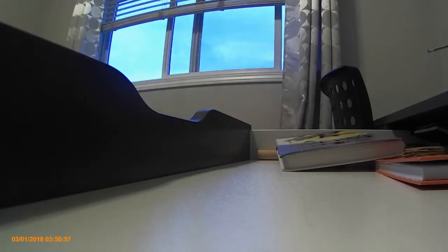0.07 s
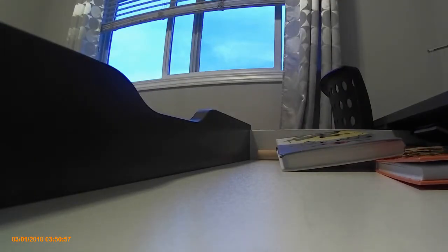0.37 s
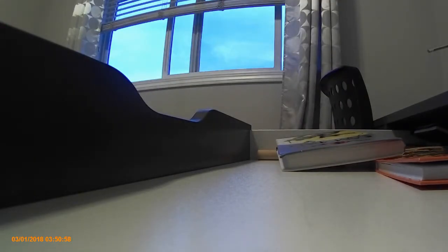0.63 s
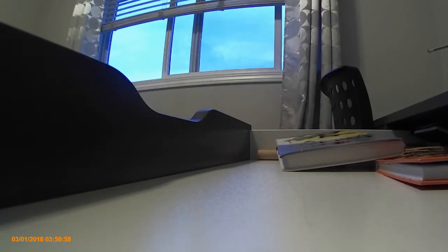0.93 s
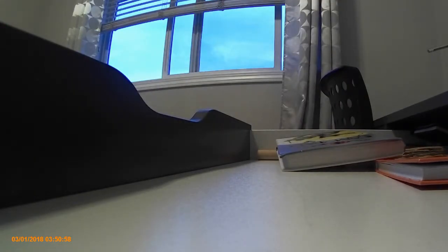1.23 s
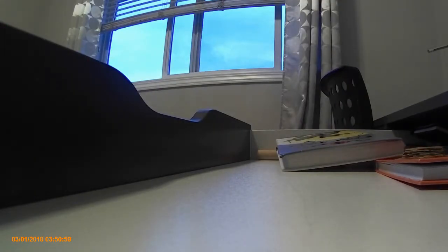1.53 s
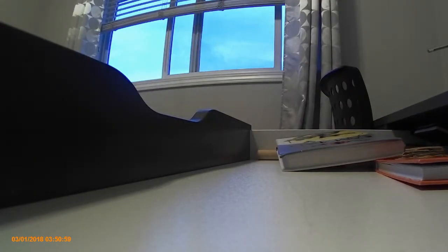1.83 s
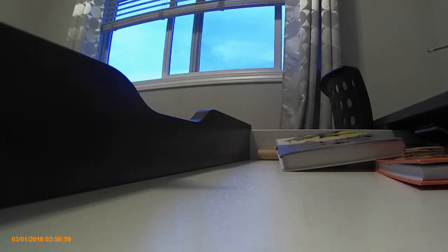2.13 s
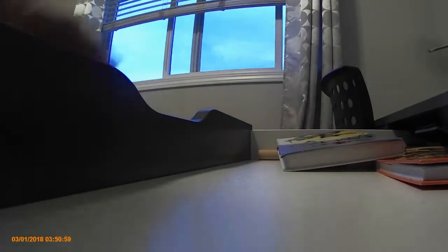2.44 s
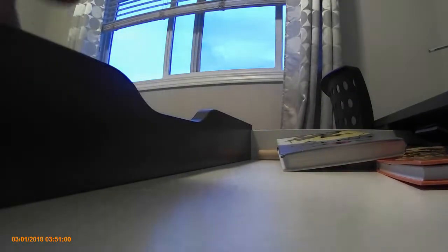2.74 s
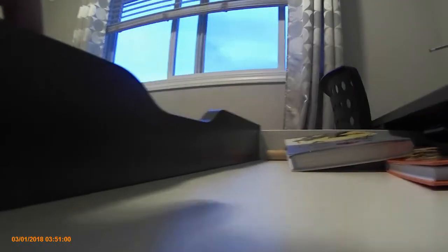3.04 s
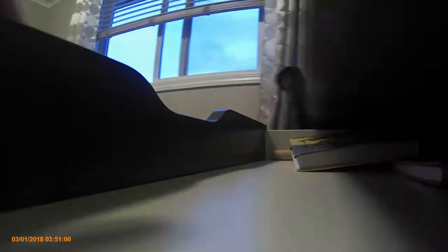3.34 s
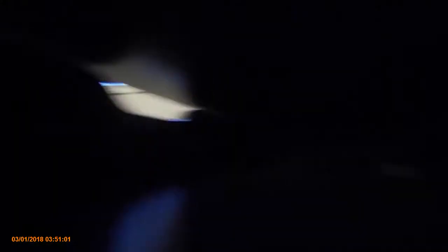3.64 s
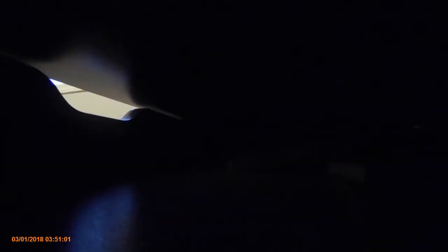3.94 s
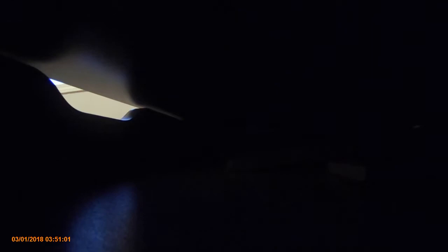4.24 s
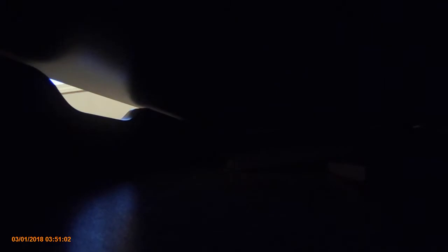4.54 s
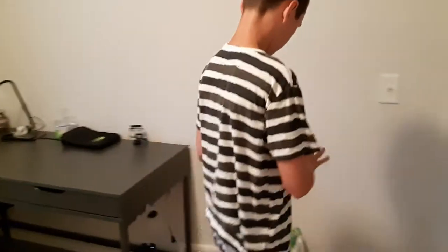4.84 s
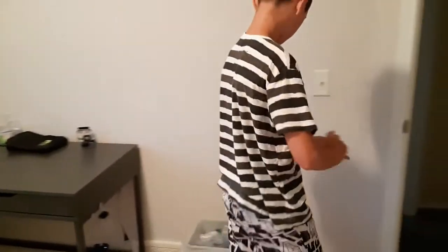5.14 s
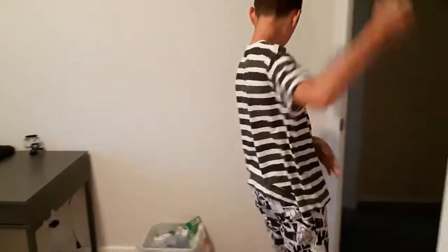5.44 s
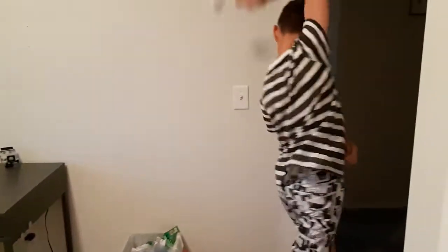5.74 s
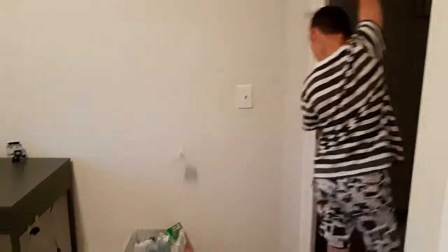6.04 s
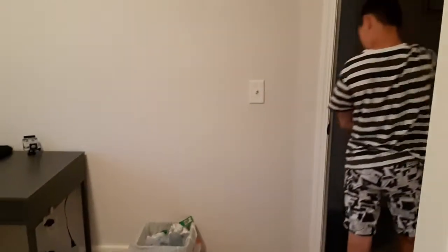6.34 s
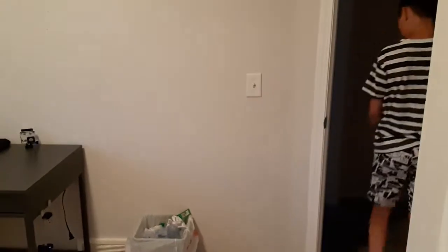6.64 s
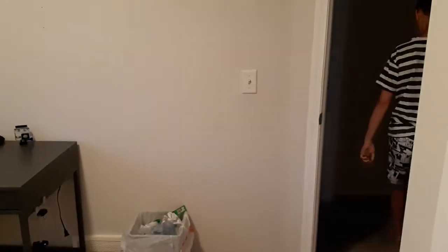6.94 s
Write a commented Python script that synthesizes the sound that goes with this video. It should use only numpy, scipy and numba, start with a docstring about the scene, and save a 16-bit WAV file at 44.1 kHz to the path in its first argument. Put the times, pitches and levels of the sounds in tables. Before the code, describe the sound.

In a quiet bedroom, clothes rustle faintly near a close microphone on a desk. A bulky case drops loudly on the wood and chatters from edge to edge. It scrapes closer with a hollow sound and bumps to rest over the microphone, distorting briefly. After a few small taps, the sound cuts to quiet stereo: hands snap and rub together off to the right, then pat a door frame with soft thuds and a slight buzz.

```python
"""A bedroom desk, heard by a close mono microphone. Clothes rustle; a bulky case drops on the wood and
chatters from edge to edge, ringing its panels and the desk top. It scrapes closer in tiny slips and
bumps to rest over the microphone, overloading it. After a cut, a quiet stereo microphone hears hands
snap and rub together, then pat a door frame on the way out: the wall thuds, the loose trim buzzes."""
import sys
import numpy as np
from scipy import signal
from scipy.fft import rfft, irfft
from scipy.io import wavfile
from scipy.ndimage import uniform_filter1d
from numba import njit

SR = 44100
rng = np.random.default_rng(int(sys.argv[2]) if len(sys.argv) > 2 else 0)


def int16_out(signal):
    """Quantize to a 16-bit WAV file."""
    q = np.round(np.clip(np.atleast_2d(signal).T, -1, 1) * 32767)
    wavfile.write(sys.argv[1], SR, q.astype(np.int16))


N = 308700
T = np.arange(N) / SR
RING_T = T[:SR // 2]   # time since a blow
CUT_S = 4.677

# desk top modes: freq_hz, level_db, t60_s
DESK_MODES = [(292.2, -22.5, 0.15), (458.7, -17.5, 0.13), (590.4, -11.5, 0.05), (711, -9.5, 0.039),
              (825, -7, 0.02), (933, -15, 0.054), (1099, -21, 0.12), (2137, -16.5, 0.04),
              (2510, -21, 0.045), (3730, -31.5, 0.086)]
# skin contact spectrum: freq_hz, density_db
SKIN_SPECTRUM = [(250, -31.5), (700, -19.5), (2000, -8.5), (3200, -6), (4700, -1.5), (7000, -9),
                 (10400, -10), (16000, -24)]
# hand meets skin or wood: start_s, snap_db, rub_db, rub_length_s
TOUCHES = [(4.678, -40.5, -47.5, 0.0088), (4.74, -54, -42.5, 0.042), (4.855, -48, -48, 0.016),
           (4.928, -38.5, -48.5, 0.053), (5.023, -48, -50, 0.033), (5.098, -40.5, -72, 0.0055),
           (5.16, -36, -50, 0.096), (5.324, -34, -57, 0.0079), (5.46, -48, -66.5, .015),
           (5.539, -41, -58.5, 0.01), (5.667, -47.5, -62, 0.006), (5.793, -74, -65, 0.018),
           (5.959, -60, -56, 0.055), (6.2655, -44.5, -47, 0.013), (6.4086, -50, -70, 0.01),
           (6.458, -66, -66, 0.021)]


def from_db(db):
    """Decibels to gain."""
    return 10 ** (np.asarray(db) / 20)


def unit_rms(x):
    """Scale to unit power."""
    return x / np.sqrt(np.mean(x ** 2) + 1e-20)


def cut(x, hz, kind, order=2):
    """Butterworth filter."""
    sos = signal.butter(order, np.clip(hz, 10, .45 * SR), kind, fs=SR, output="sos")
    return signal.sosfilt(sos, x)


def colour(x, spectrum):
    """Impose a spectrum, rolled off beyond its ends; rms 1."""
    hz, db = np.transpose(spectrum)
    bin_hz = np.maximum(np.fft.rfftfreq(x.shape[-1], 1 / SR), 1)
    skirts = np.minimum(bin_hz / hz[0], 1) ** 2 * np.minimum(hz[-1] / bin_hz, 1) ** 2
    gain = from_db(np.interp(np.log(bin_hz), np.log(hz), db))
    return unit_rms(irfft(rfft(x) * skirts * gain, x.shape[-1]))


def drift(rate_hz):
    """Random wander; rms 1."""
    points = rng.standard_normal(int(8 * rate_hz) + 2)
    return unit_rms(np.interp(T * rate_hz, np.arange(len(points)), points))


def friction(slips_per_s, spread_db):
    """Tiny slips of uneven size at random moments."""
    sizes = from_db(spread_db * np.minimum(rng.exponential(1, N), 4)) * rng.standard_normal(N)
    return unit_rms(sizes * (rng.random(N) < slips_per_s / SR))


def place(events):
    """Mix (start_s, level_db, sound) events into one track."""
    out = np.zeros(N)
    for start_s, db, sound in events:
        start = round(start_s * SR)
        out[start:start + len(sound)] += from_db(db) * sound[:N - start]
    return out


def envelope(start_s, attack_s, hold_s, t60_s):
    """Rise, hold, decay."""
    decay_db = -60 * np.clip((T - start_s - attack_s - hold_s) / t60_s, 0, 3)
    return np.clip((T - start_s) / attack_s, 0, 1) * from_db(decay_db)


def strokes(rows, rise_s, fall_s):
    """Rubbing speed: strokes swell and fade; their powers add."""
    power = 0
    for peak_s, db in rows:
        falloff = np.where(T < peak_s, ((T - peak_s) / rise_s) ** 2 / 2, (T - peak_s) / fall_s)
        power += from_db(2 * db) * np.exp(-2 * np.minimum(falloff, 20))
    return np.sqrt(power)


def struck(modes):
    """Decaying modes; each blow lands elsewhere, reweighting and slightly detuning them."""
    hz, db, t60_s = np.transpose(modes)[:, :, None]
    hz = hz * (1 + .008 * rng.standard_normal(hz.shape))
    gains = from_db(db + 2.5 * rng.standard_normal(hz.shape))
    signs = (-1) ** np.arange(len(hz))[:, None]
    rings = from_db(-60 * RING_T / t60_s) * np.sin(2 * np.pi * hz * RING_T)
    return np.sum(gains * signs * rings, axis=0)


def burst(spectrum, t60_s):
    """Dense modes that die together."""
    return colour(rng.standard_normal(len(RING_T)), spectrum) * from_db(-60 * RING_T / t60_s)


def blows(rows, modes, crack_db, crack_t60_s):
    """Contacts ring the modes plus a crack whose treble dies first; soft ones are duller."""
    # short-lived modes: freq_hz, density_db
    spectrum = [(100, -17.5), (300, -4.5), (700, 3.5), (1600, -9.5), (2500, -3), (3300, -19), (8000, -18),
                (16000, -31.5)]
    events = []
    for start_s, db, brightness_hz, *_ in rows:
        crack = cut(burst(spectrum, crack_t60_s), 2200, "low", order=4)
        crack += from_db(2.5) * burst(spectrum, t60_s=0.016)
        contact = struck(modes) + from_db(crack_db) * crack
        events.append((start_s, db, cut(contact, brightness_hz, "low")))
    return place(events)


@njit
def moving_resonance(x, angle_rad, radius):
    """Two-pole resonator with moving pitch."""
    y = np.zeros(len(x))
    for i in range(2, len(x)):
        y[i] = x[i] - x[i - 2] + 2 * radius * np.cos(angle_rad[i]) * y[i - 1] - radius ** 2 * y[i - 2]
    return y


def desk_background(covered):
    """Room air, its middle damped once covered, and a thin electronic whine."""
    # room air: freq_hz, density_db
    spectrum = [(30, -15), (150, -2.5), (319, 0.5), (937, -5), (1500, -17), (2170, -17), (3060, -26),
                (13700, -32), (16000, -39)]
    whine_hz = 8230
    air = from_db(-64.5) * colour(rng.standard_normal(N), spectrum)
    air -= 0.62 * covered * cut(air, [250, 2500], "band", order=1)
    return air + from_db(-92) * np.sin(2 * np.pi * whine_hz * T)


def wood_taps():
    """Light taps on wood, the later ones as things settle."""
    # taps: start_s, force_db, brightness_hz
    contacts = [(.122, -41.5, 1140), (3.945, -43.5, 1700), (3.957, -51, 1000), (4.022, -50, 1500),
                (4.104, -58, 1200), (4.241, -46.5, 560), (4.356, -53.5, 560), (4.44, -52.5, 560),
                (4.532, -51.5, 560), (4.628, -52, 560)]
    # tapped wood: freq_hz, level_db, t60_s
    modes = [(254, -9.5, 0.071), (476, -2, 0.068), (592, -7, 0.07), (867, -6.5, 0.029)]
    return blows(contacts, modes, crack_db=-8.5, crack_t60_s=.035)


def clothes(covered):
    """Cloth friction: quick swishes on slower, earlier shifts; thinner once covered."""
    # swishes: peak_s, level_db, rise_s
    swishes = [(.335, -61, .02), (0.393, -53, 0.0071), (0.555, -51.5, 0.013), (.74, -65.5, 0.026),
               (0.801, -45, 0.0051), (1.452, -53, 0.015), (1.514, -58, 0.011), (1.635, -68, 0.018),
               (3.801, -50.5, 0.04), (4.062, -60.5, 0.14), (4.25, -58, 0.035)]
    # rubbing cloth: freq_hz, density_db
    spectrum = [(220, -4.5), (690, -3.5), (960, 5), (1550, -5), (2300, -3), (3200, -12), (4400, -17),
                (6000, -31), (16000, -44)]
    quick = sum(strokes([(s, db)], rise_s, fall_s=0.035) for s, db, rise_s in swishes)
    slow = strokes([(s - 0.03, db - 19) for s, db, _ in swishes], rise_s=0.089, fall_s=0.11)
    rustle = (quick + slow) * colour(friction(slips_per_s=4600, spread_db=0.5), spectrum)
    return (1 - covered) * rustle + covered * cut(rustle, [1200, 3600], "band")


def case_drop():
    """Each edge rings the desk and one case panel; flat landings add a thump."""
    # edge landings: start_s, force_db, brightness_hz, panel_hz
    knocks = [(2.3263, 0, 5486, 400), (2.3395, 0, 7520, 405), (2.4868, -14.5, 851, 538),
              (2.504, -11, 5414, 408), (2.520, -25, 2176, 470), (2.588, -10.5, 4040, 734),
              (2.6125, -18.5, 1708, 602), (2.6305, -20, 1705, 720), (2.650, -28, 1310, 670),
              (2.6763, -4, 7000, 745), (2.7238, -26, 3415, 890), (2.7528, -12.5, 4890, 512),
              (2.7717, -20.5, 4000, 860), (2.784, -20.5, 3000, 594)]
    # flat landings: start_s, level_db
    flats = [(2.3263, -12.5), (2.346, -20), (2.5042, -24)]
    # desk under the full weight: freq_hz, level_db, t60_s
    thump_modes = [(135.7, -3.5, 0.12), (248, -2, 0.1), (314.4, -8.5, 0.24)]
    panel_db, panel_t60_s = -5, 0.039
    desk = blows(knocks, DESK_MODES, crack_db=-5, crack_t60_s=0.053)
    panels = place((s, db, struck([(hz, panel_db, panel_t60_s)])) for s, db, _, hz in knocks)
    thumps = place((s, db, struck(thump_modes)) for s, db in flats)
    return desk + panels + thumps


def room_echo(x):
    """Diffuse echo: builds over the first reflections, dies octave by octave."""
    # bedroom reverberation: freq_hz, level_db, t60_s
    bands = [(100, -6, 0.35), (297, 7.5, 0.25), (2493, -4, 0.3), (13650, -8, 0.21)]
    hz, db, t60_s = np.transpose(bands)
    tail = 0
    for low_hz in 40 * 2. ** np.arange(9):
        log_centre = np.log(low_hz * np.sqrt(2))
        band_db, band_t60_s = (np.interp(log_centre, np.log(hz), column) for column in (db, t60_s))
        noise = cut(rng.standard_normal(len(RING_T)), [low_hz, 2 * low_hz], "band")
        tail += noise * from_db(band_db - 60 * RING_T / band_t60_s)
    tail *= np.clip((RING_T - .004) / 0.00298, 0, 1)
    return signal.fftconvolve(x, tail / np.sqrt(SR * 0.016))[:N]


def scrape():
    """The case drags in small slips over its hollow; the edge judders on the last shove."""
    # pushes: start_s, attack_s, hold_s, level_db
    pushes = [(2.83, 0.08, 0.16, -42.5), (3.01, 0.15, 0.16, -33.5), (3.346, .03, 0.19, -37.5)]
    # case sliding on wood: freq_hz, density_db
    spectrum = [(70, -35.5), (230, -5.5), (650, -3), (1150, -7.5), (1470, -16.5), (2450, -19),
                (3200, -32.5), (4000, -32), (5500, -46.5), (16000, -52.5)]
    shove_s, judder_hz = 3.583, 322
    sliding = sum(from_db(db) * envelope(*timing, t60_s=0.59) for *timing, db in pushes)
    shove = from_db(-16) * envelope(shove_s, attack_s=0.0049, hold_s=0.088, t60_s=.1)
    catching = from_db(1.7 * drift(130))
    slips = friction(slips_per_s=5000, spread_db=1) * catching
    pitch_hz = judder_hz * (1 + 0.0496 * drift(120))
    judder = np.sin(2 * np.pi * np.cumsum(pitch_hz) / SR) * catching
    judder_gain = from_db(-11.5) * envelope(shove_s, attack_s=0.065, hold_s=0.0785, t60_s=0.0454)
    drag = colour(slips, spectrum) * (sliding + shove * np.abs(judder))
    cavity = hollow(start_s=pushes[0][0], end_s=shove_s) * sliding * catching
    return drag + cavity + judder * judder_gain


def hollow(start_s, end_s):
    """Rubbing drives resonances under the case; they sink and grow as the gap closes."""
    # cavity modes at reference_s: freq_hz, level_db, growth_db_per_s
    modes = [(343.5, 0, 42.5), (483, 2.5, 25.5)]
    reference_s, sag_per_s, width_hz = 3.45, 0.34, 27
    closing_s = np.clip(T, start_s, end_s) - reference_s
    radius = np.exp(-np.pi * width_hz / SR)
    out = 0
    for hz, db, growth_db_per_s in modes:
        angle_rad = 2 * np.pi * hz * (1 - sag_per_s * closing_s) / SR
        ring = cut(moving_resonance(rng.standard_normal(N), angle_rad, radius), 2 * hz, "low")
        running_rms = np.sqrt(np.abs(uniform_filter1d(ring ** 2, size=1300)) + 1e-12)
        out += from_db(db + growth_db_per_s * closing_s) * ring / running_rms
    return out


def edge_ticks():
    """The sliding edge catches and lets go with a dull tick."""
    # catches: start_s, level_db
    catches = [(2.905, -28.5), (3.036, -23.5), (3.464, -22.5), (3.516, -20)]
    return cut(place((s, db, struck(DESK_MODES)) for s, db in catches), 1500, "low")


def case_bumps():
    """The case jolts the desk frame; each rebound is sooner, weaker and duller."""
    # landings: start_s, force_db, brightness_hz, first_gap_s, rebound_loss_db
    landings = [(3.545, -30.5, 401, .014, 3), (3.586, -4, 1800, 0.0047, 4), (3.62, -7, 2500, 0.0084, 11),
                (3.668, -11, 4000, 0.02, 7.5), (3.777, -33.5, 596, .029, 10)]
    # desk frame: freq_hz, level_db, t60_s
    modes = [(64.6, -2, 0.23), (124, -12.5, 0.16), (166, 1, 0.17), (187.7, -15.5, 0.44), (212.1, -8.5, 0.3),
             (249, -5, 0.151), (316.5, -2.5, 0.13), (479.4, -12.5, 0.13)]
    gap_ratio, brightness_ratio = 0.84, 0.639
    contacts = [
        (s + gap_s * np.sum(gap_ratio ** np.arange(k)), db - loss_db * k, hz * brightness_ratio ** k)
        for s, db, hz, gap_s, loss_db in landings for k in range(4)]
    return blows(contacts, modes, crack_db=-6.5, crack_t60_s=0.046)


def grip():
    """A hand on the case sends a low rumble through the desk."""
    # presses: peak_s, level_db
    presses = [(3.85, -49), (4.32, -56.5), (4.63, -58)]
    # desk rumble: freq_hz, density_db
    spectrum = [(28, -23), (54, 4.5), (95, -16.5), (165, 4.5), (240, -14), (700, -22.5)]
    return strokes(presses, rise_s=0.092, fall_s=0.11) * colour(rng.standard_normal(N), spectrum)


def door_air():
    """Room air, partly common to both channels."""
    # air by the door: freq_hz, density_db
    spectrum = [(30, -18), (64, -4.5), (450, -26.5), (2300, -35), (4800, -20), (16000, -42)]
    return from_db(-84.5) * colour(rng.standard_normal((2, N)) + rng.standard_normal(N), spectrum)


def fidget():
    """Fingers and sleeves brush thinly between touches, fading."""
    fade_db_per_s, end_s = 7.5, 5.8
    gain = from_db(-62 - fade_db_per_s * (T - CUT_S))
    grain = colour(friction(slips_per_s=2200, spread_db=0), SKIN_SPECTRUM)
    gate = envelope(CUT_S, attack_s=0.0054, hold_s=end_s - CUT_S, t60_s=0.32)
    return gain * gate * cut(grain, 3600, "high")


def snaps():
    """Each touch opens with a bright snap of skin."""
    return place((s, db - 5.5, cut(burst(SKIN_SPECTRUM, t60_s=.026), 4500, "high", order=1))
                 for s, db, _, _ in TOUCHES)


def rubs():
    """Skin grips and slips, speeding up until lift-off; light rubbing leaves only treble."""
    swell_db, rise_s, fall_s = 3, 0.0088, 0.03
    full_body_db, crossover_hz = -46.5, 1800
    power = 0
    for start_s, _, db, length_s in TOUCHES:
        age_s = T - start_s
        attack = np.clip(age_s / rise_s, 0, 1)
        swell = from_db(db - swell_db * np.clip(1 - age_s / length_s, 0, 1))
        release = np.exp(-np.clip((age_s - length_s) / fall_s, 0, 20))
        power += (attack * swell * release) ** 2
    speed = np.sqrt(power)
    grain = colour(friction(slips_per_s=5000, spread_db=1.6), SKIN_SPECTRUM)
    grain *= from_db(1.27 * drift(140))
    body = cut(grain, crossover_hz, "low") * np.minimum(speed / from_db(full_body_db), 1)
    treble = cut(grain, crossover_hz, "high", order=1)
    return speed * (treble + body)


def smacks():
    """Sharp hand smacks with a brief bright ring."""
    # hand smacks: start_s, level_db
    hits = [(5.662, -44), (6.2663, -39), (6.28, -37)]
    rings_hz = (4800, 6130)
    slaps = place((s, db, burst(SKIN_SPECTRUM, t60_s=0.036)) for s, db in hits)
    return sum(signal.lfilter(*signal.iirpeak(hz, Q=13.5, fs=SR), slaps) for hz in rings_hz)


def wall_pats():
    """Pats thud in the wall, where bass lingers; the door frame rings, its loose trim buzzes."""
    # pats: start_s, thud_db, buzz_db
    pats = [(5.999, -70.5, -59), (6.283, -62, -65)]
    # wall thud: freq_hz, density_db
    wall_spectrum = [(90, -16), (330, -2), (1000, 0.5), (2000, -15.5)]
    # door frame: freq_hz, level_db, t60_s
    frame_modes = [(252, -10, 0.92), (346, -7.5, 0.32)]
    # trim buzz: freq_hz, density_db
    trim_spectrum = [(2150, -22), (2400, -9), (2650, -24)]
    events = []
    for start_s, thud_db, buzz_db in pats:
        boom = from_db(-3.5) * cut(burst(wall_spectrum, t60_s=0.98), 295, "low", order=4)
        thud = burst(wall_spectrum, t60_s=0.3) + boom + struck(frame_modes)
        buzz = burst(trim_spectrum, t60_s=0.24)
        events += [(start_s, thud_db, thud), (start_s, buzz_db, buzz)]
    return place(events)


def at_desk():
    """Mono microphone on the desk; the case ends up covering it."""
    covered = np.clip((T - 3.3) / 0.37, 0, 1)
    drop, bumps = case_drop(), case_bumps()
    quiet = clothes(covered) + desk_background(covered) + edge_ticks() + wood_taps()
    echo = from_db(-18) * room_echo(drop) + from_db(-35.5) * room_echo(bumps)
    return quiet + drop + scrape() + bumps + echo


def at_door():
    """Stereo microphone, hands a few steps off to the right; its port rings in the treble."""
    left_delay_s, port_hz = .00008, 4900
    hands = fidget() + rubs() + smacks() + snaps()
    wall = wall_pats()
    left = from_db(-10) * np.interp(T - left_delay_s, T, hands)
    right = from_db(5.5) * hands
    echo = np.array([from_db(4.5) * room_echo(hands), from_db(-0.5) * room_echo(hands)])
    sound = np.array([left, right]) + wall + echo + door_air()
    return sound + 0.72 * signal.lfilter(*signal.iirpeak(port_hz, Q=16, fs=SR), sound)


def scene():
    """Desk, hard cut, door; the grip rumble dies away across the cut."""
    return np.where(T < CUT_S, at_desk(), at_door()) + grip()


def record(dry):
    """Input stage: low cut, hard overload, steep low-pass."""
    low_cut_hz, ceiling, cutoff_hz = 36, 0.091, 16000
    clipped = np.clip(cut(dry, low_cut_hz, "high"), -ceiling, ceiling)
    return signal.sosfilt(signal.ellip(10, .1, 70, cutoff_hz, fs=SR, output="sos"), clipped)


dry = scene()
out = record(dry)
int16_out(out)
```